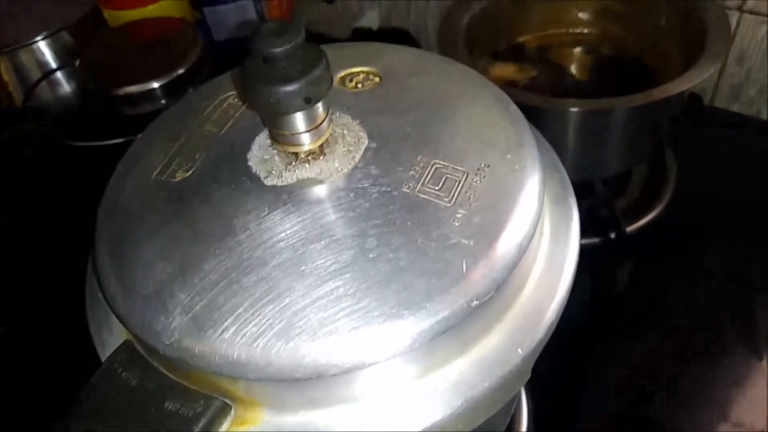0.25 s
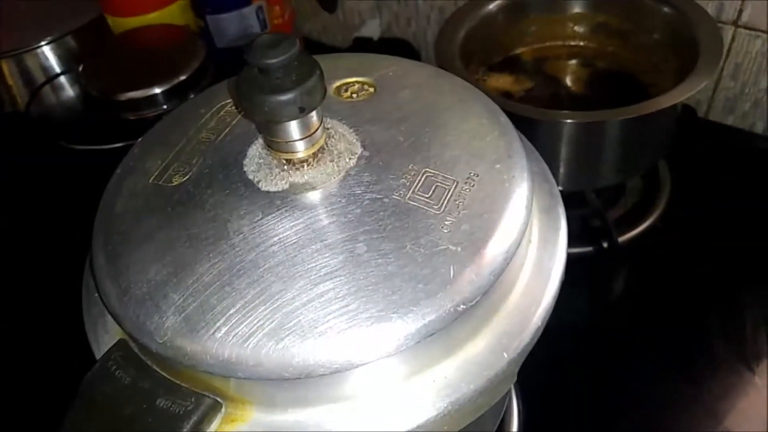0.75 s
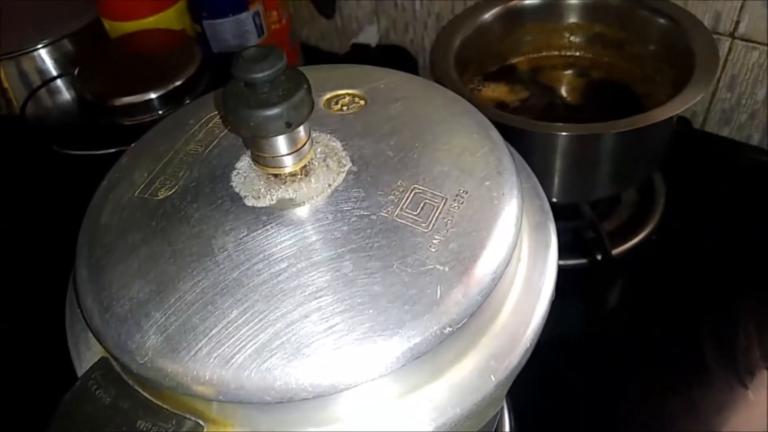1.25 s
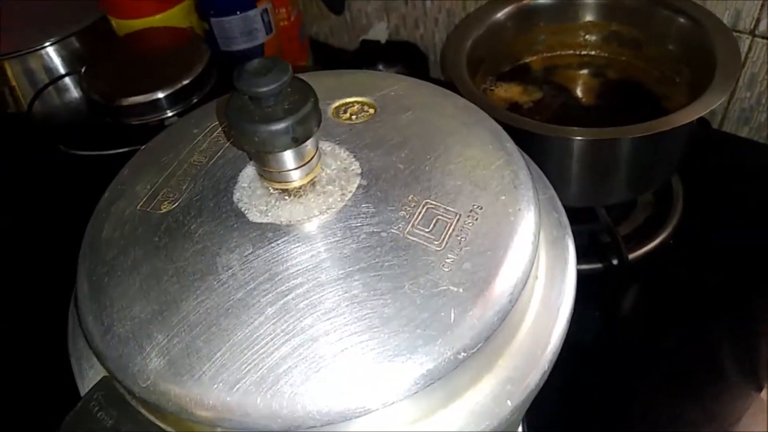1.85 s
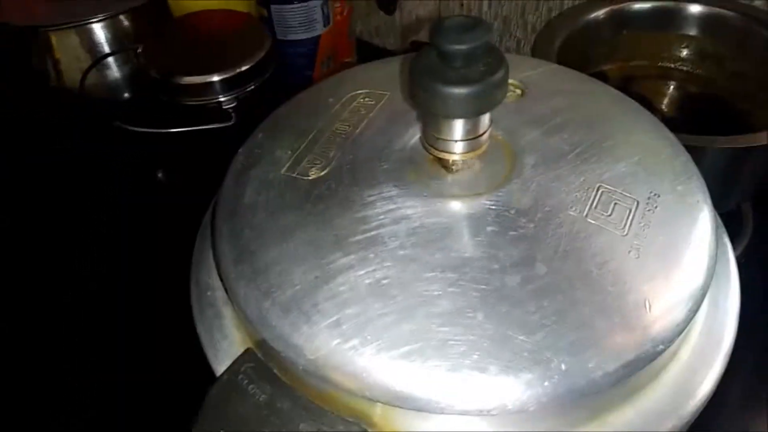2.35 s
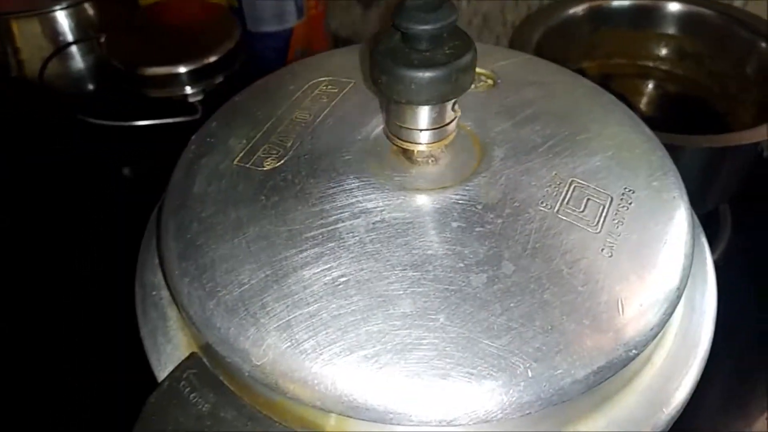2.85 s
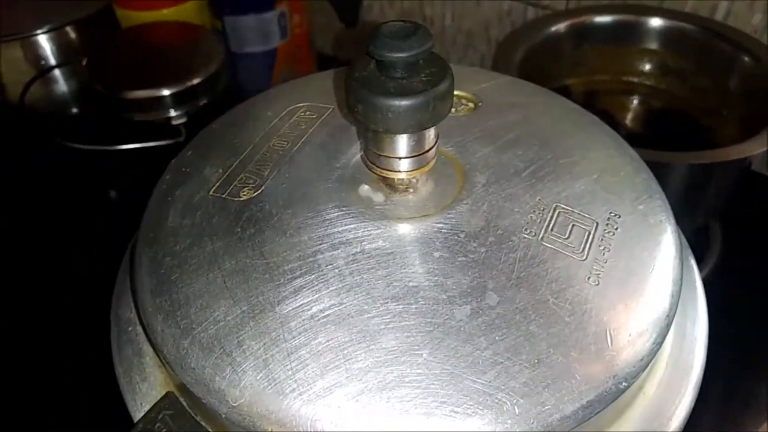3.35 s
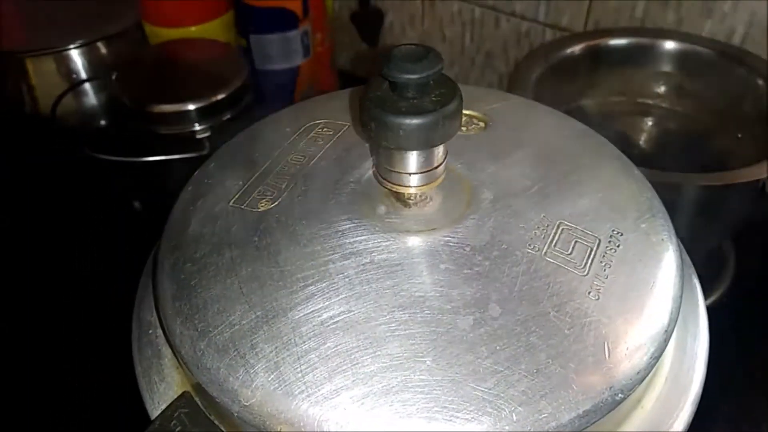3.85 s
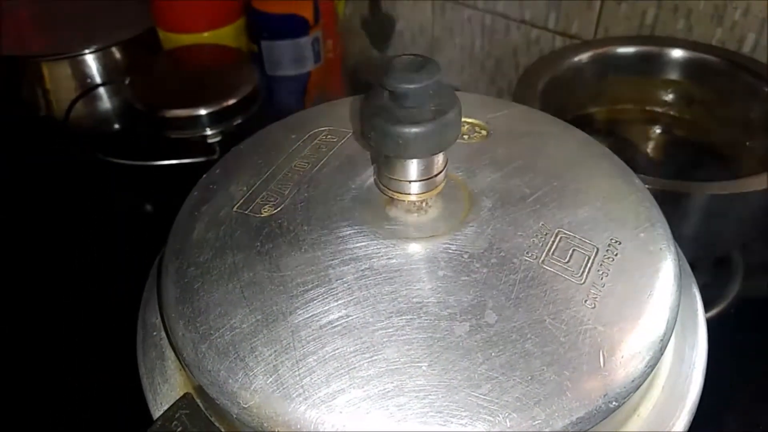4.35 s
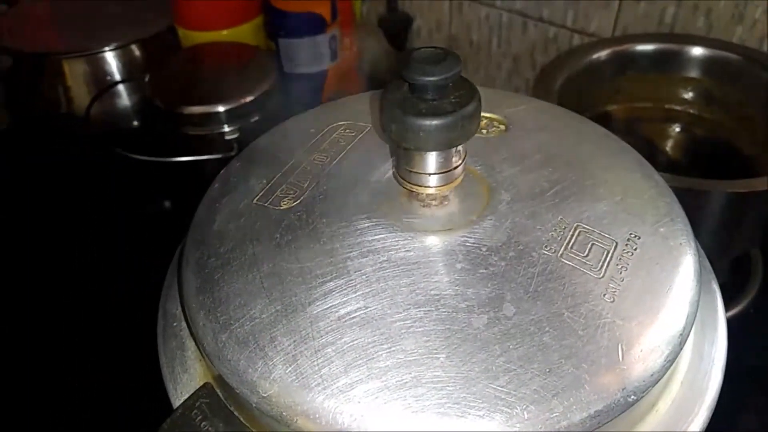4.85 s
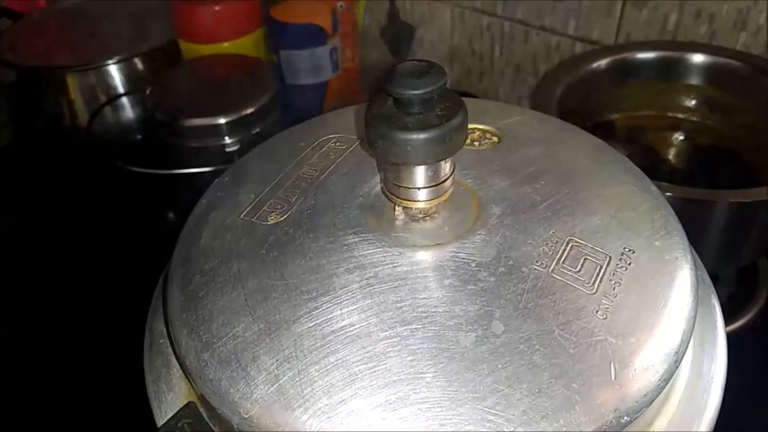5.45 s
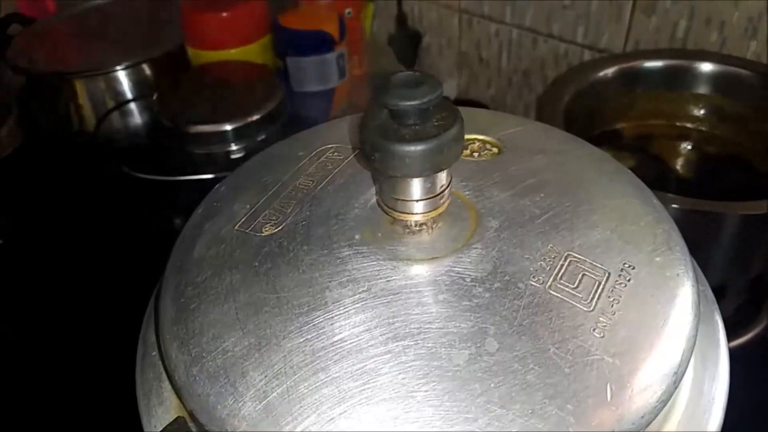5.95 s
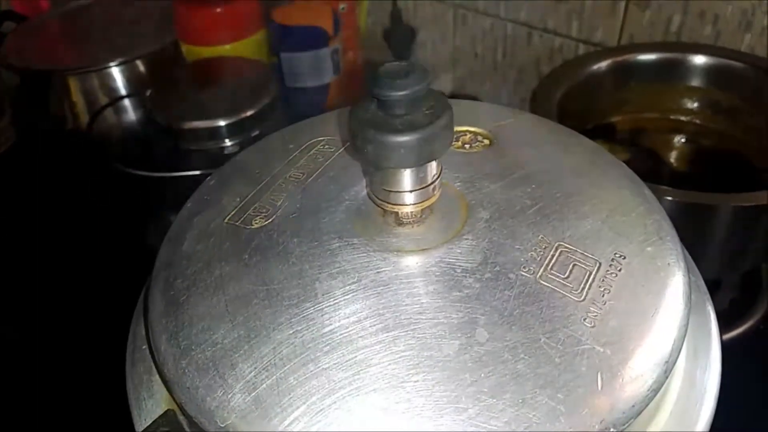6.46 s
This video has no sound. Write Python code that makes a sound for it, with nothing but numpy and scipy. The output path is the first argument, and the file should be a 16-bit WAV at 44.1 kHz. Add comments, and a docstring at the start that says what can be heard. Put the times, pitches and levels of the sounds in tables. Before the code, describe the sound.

A pressure cooker heard close up in stereo on a gas stove. From 0 to 2.3 s it is quiet: soft flame and room noise, a low hum dying away, high fine froth fizzing with tiny pops at the vent, and dull bubble thumps in the pot. A short dry steel scrape comes at 0.3 s; a longer one from 1.0 to 2.2 s, left-leaning, catches and sings with a thin wavering tone around 1.3 kHz, with a firmer knock near 1.57 s. At 2.3 s the vent blows clear with a burst and bright steam hiss continues, growing by 3.2 s. From 3.4 to 4.3 s the nozzle rings breathily and puffs sputter irregularly. It steadies until about 5.2 s, then chuffs return roughly every 0.15 s, strongest from 6 s to the end at 6.7 s, with livelier small bubbling beneath.

```python
"""A pressure cooker on a gas stove, close to two microphones. From the start: flame and room noise, a fading
hum, bubble thumps in the pot (damped modes) and froth fizzing at the vent (shaped noise with pops).
Steel is scraped from 0.3 s and again from 1 s, louder at the left: noise through modes, later a wavering tone.
At 2.3 s the vent blows clear and steam jets out as shaped noise, its regions swelling on their own.
From 3.3 s the nozzle rings and the rocking weight lets out puffs; the small bubbles grow louder at the end."""
import sys
import numpy as np
from scipy import signal
from scipy.io import wavfile
from scipy.ndimage import uniform_filter1d

SR = 44100
rng = np.random.default_rng(int(sys.argv[2]) if len(sys.argv) > 2 else 0)


def wav_out(sig):
    """Save sig, one row per channel (or a flat mono array), as 16-bit PCM at SR to the path in sys.argv[1]."""
    wavfile.write(sys.argv[1], SR, np.round(np.clip(np.atleast_2d(sig).T, -1, 1) * 32767).astype(np.int16))


N = 295847
FRAME_SAMPLES = 256  # short-time frame of froth and jet

# Froth at the vent: time_s, relative_level_db, relative_left_minus_right_db
FROTH_CURVE = [(0, -59.5, -9), (.7, -61.5, -7), (1.0, -58, -7), (1.11, -55, -8), (1.13, -64, -6),
               (1.45, -58.5, -11), (1.8, -59, -16), (2.12, -59.5, -9), (2.26, -56.5, -15)]
# Froth spectrum: frequency_hz, relative_density_db
FROTH_SPECTRUM = [(880, -61), (1500, -17), (2560, -8.5), (3260, -8), (3700, -10.5), (4480, -24),
                  (5100, -5.5), (5800, -1), (7490, 3), (8500, 6), (9700, 7.5), (10600, 0.5), (13000, -20)]
# Froth balance: frequency_hz, left_minus_right_db
FROTH_SIDES = [(60, -2.0), (150, -0.5), (380, 1.5), (950, 2), (2380, -1), (5980, -1.5), (15000, -16.5)]
# Larger bubbles popping in the foam: start_s, level_jump_db
FOAM_POPS = [(.07, 5.5), (.21, 2), (.295, 4), (.47, 2.5), (.58, 6), (0.72, 9), (.88, 2)]

# Thumps of big bubbles: start_s, peak_db, relative_weight_above_100_hz_db, tilt_190_to_760_hz_db_per_octave
BUBBLE_THUMPS = [(.304, -52.5, -5, -11), (.415, -60, -22, 2), (.756, -53.5, -36, 0), (1.121, -55.5, -5, -3),
                 (1.322, -52.5, 4, -11), (1.49, -53.5, -9, 7), (1.503, -61, -6, 13), (1.514, -61, -4, 6),
                 (1.561, -41.5, 8, -5.5), (1.572, -37, 22, -6), (1.595, -42.5, 22, -6.5),
                 (1.622, -51.5, 18, -7), (1.638, -49, 13, -9), (1.79, -50, -10, -9), (1.94, -52, -23, 8.5),
                 (2.105, -50.5, -8, -10), (2.138, -43.5, -21, -5), (2.199, -51, -36, -1),
                 (2.257, -44.5, -4, -2), (2.309, -51.5, 10, -11), (2.752, -52, -12, -10),
                 (2.856, -51, -21, -10), (2.929, -46.5, -12, -6), (3.054, -50.5, -12.5, -9),
                 (3.13, -48.5, -18, -3), (3.227, -49, -6, -5.5), (3.436, -49, 2, -3),
                 (3.554, -45.5, -12, -7), (3.654, -48.5, -14, 6), (3.893, -48, -11, 2),
                 (4.175, -43, -4, -7), (4.25, -57, 3, -10), (4.299, -45, -13, -4), (4.36, -54.5, -15, 10),
                 (4.405, -53.5, -30, 4), (4.475, -52.5, -1, -15), (4.759, -48, -13, -9),
                 (4.855, -41, -13.5, -8), (4.97, -45, -24, -1), (5.109, -48.5, -19, -12),
                 (5.207, -44.5, -27, -3), (5.314, -55, -18, 2), (5.665, -43.5, -8, -3),
                 (6.451, -48.5, 8, -3), (6.629, -55, 4, -10)]
# Pot modes before random spread: frequency_hz, relative_level_db, t60_s
POT_MODES = [(73, 0.5, 0.12), (164.2, 0.5, 0.17), (204, -3, 0.19), (260.5, -10, 0.12), (314.5, -2, 0.11),
             (398, 0, 0.062), (511, 1, 0.061), (656, 7, 0.036)]
# Small bubbles: time_s, level_change_db
SIMMER_CURVE = [(5.4, -15), (5.9, -11.5), (6.7, -4)]
# Flame and room spectrum: frequency_hz, relative_density_db
AIR_SPECTRUM = [(15, -35), (30, -19), (60, 0), (161, -3), (400, -7), (587, -13.5), (1550, -12), (2660, -29),
                (4450, -10.5), (6850, -23), (9460, -17), (11800, -13.5), (15800, -13.5)]
# Flame and room, part shared by the sides: frequency_hz, likeness_0_to_1
AIR_LIKENESS = [(50, 0.88), (300, 0.78), (700, 0.69), (1500, 0.013)]
# Low room hum: mean_frequency_hz, start_level_db, fade_s, waver_hz
HUM_TONES = [(321, -69.5, 0.73, 3.3), (165, -70, 1, 4)]

# Scraping: start_s, attack_s, hold_s, release_s, relative_level_db, ringing_share, relative_rasp_db,
# rasp_darkening_db_per_octave_per_s
SCRAPE_STROKES = [(0.285, 0.089, 0.037, 0.13, -57.5, .05, 14.5, 160),
                  (1.026, 0.075, 1, 0.16, -63, 0.89, -20, 5)]
# Strokes catching: start_s, level_rise_db, rasp_rise_db, fade_s
SCRAPE_CATCHES = [(1.168, 4.5, 0, 0.054), (1.372, 4, 12, 0.14), (1.551, 4.5, 11, 0.15), (1.82, 4, -7, 0.11)]
# Thin steel modes: frequency_hz, width_hz, relative_level_db
STEEL_MODES = [(1350, 260, -6), (3470, 28, -7), (3720, 28, -7), (4010, 1530, -6)]
# Dry rasp spectrum: frequency_hz, relative_density_db
RASP_SPECTRUM = [(1500, -22), (2000, 0), (2500, 4.5), (3000, 3), (3500, 2), (4100, 7), (4800, -14),
                 (6000, -19)]
# Main mode sinking: time_s, pitch_factor
MAIN_MODE_SAG = [(1.75, 1), (1.95, .976), (2.15, .97)]
# Broad low mode joining in: start_s, attack_s, hold_s, release_s
LOW_MODE_SPAN_S = (1.32, .1, .38, .2)
# Upper mode joining in: start_s, attack_s, hold_s, release_s
UPPER_MODE_SPAN_S = (1.57, .06, .31, .12)
# Near-pure tone of the low mode: time_s, pitch_hz, relative_level_db
SINGING_CURVE = [(1.32, 1265, -97), (1.36, 1262, -68), (1.42, 1262, -64), (1.46, 1270, -84),
                 (1.5, 1275, -59), (1.55, 1264, -86), (1.66, 1260, -78), (1.72, 1280, -59),
                 (1.79, 1250, -75.5), (1.9, 1252, -75), (2.04, 1270, -88)]
STROKE_EDGE_DB = -17  # level at both ends of an attack or release
SCRAPE_LEFT_RIGHT_DB, SCRAPE_LEFT_LAG_SAMPLES = (8.5, 5.2), 13.8

# Steam jet: time_s, relative_flow_db, hollow_swell_db, roar_swell_db, level_near_5300_hz_db
JET_CURVE = [(2.277, -50.5, 1, 1.5, -8), (2.57, -51, -1, 1, -2.5), (2.91, -48.5, -1.5, -0.5, -4),
             (3.05, -48, -1.5, 1, 1), (3.22, -41.5, -6.5, -2.5, -1), (3.4, -45.5, -4.5, 7, 4),
             (3.7, -41.5, -3.5, -1, 5), (4.02, -44.5, 0, -1, 3.5), (4.07, -46.5, -3.5, -1.5, 0.5),
             (4.4, -46, -2, -0.5, 0.5), (4.8, -45, 0, -2.5, 2), (5.1, -45, 3.5, -2, 0),
             (5.25, -45, 0.5, -3.5, 0.5), (5.8, -44.5, 0, -2, 1), (6.07, -46, 4, -0.5, -1),
             (6.51, -46.5, 0, -4.5, 0.5), (6.71, -41.5, -0.5, 0.5, 2.5)]
# Jet spectrum: frequency_hz, relative_density_db
JET_SPECTRUM = [(290, -26), (500, -30.5), (578, -25.5), (891, -24), (1400, -19.5), (2100, -16.5),
                (2900, -14), (3400, -8), (3620, -50), (3850, -8), (4500, -14), (5300, -10.5), (6000, -6.5),
                (8740, -0.5), (10900, -1.5), (12700, -13.5), (15100, -17.5), (15800, -14)]
# Jet balance: frequency_hz, left_minus_right_db
JET_SIDES = [(1000, 1), (2500, 2), (5500, -1.5), (7200, -3), (8300, -18), (9300, -3), (10500, -5.5),
             (12500, 3), (15000, -4.5)]
# Jet, part shared by the sides: frequency_hz, likeness_0_to_1
JET_LIKENESS = [(400, 0.98), (1500, 0.36), (4000, 0.35), (7000, 0.39), (10500, 0.36), (13000, 0.08),
                (15000, 0.29)]
# Nozzle, cap hollow, roar, fizz, band near 5.3 kHz: centre_hz, width_octaves, left_share, right_share
JET_REGIONS = [(8655, 0.17, 0.35, 1.204), (6805, 0.21, 1, 1.33), (1900, 1, 0.76, 0.9),
               (13850, 0.22, 0.64, 1.8), (5320, 0.2, 1, 1.47)]
# Thin hiss of a puff: centre_hz, width_octaves, left_share, right_share
PUFF_HISS = (10670, 0.2, 1.6, 1.26)
# Deep huff of a puff: centre_hz, width_octaves, left_share, right_share
PUFF_HUFF = (590, 1.6, 1.12, 1.7)
# Low chuff of a puff: width_octaves, left_share, right_share
PUFF_CHUFF = (0.64, 2.56, 2)
# Puffs under the rocking weight: time_s, length_s, chuff_centre_hz, flow_rise_db, nozzle_rise_db,
# hollow_rise_db, chuff_rise_db, hiss_rise_db, huff_rise_db
WEIGHT_PUFFS = [(3.396, 0.065, 2400, 3.5, -0.3, 7, 0, -1, -1),
                (3.682, 0.019, 2400, -1.5, 0, 3.5, 2.5, 2, 3), (3.726, 0.021, 1900, -1.5, 0, -2, 3, -3, 1),
                (3.833, 0.084, 2200, 0.8, 2.5, 4.5, 0.7, -1, -1),
                (3.887, 0.026, 2200, -0.5, 1.7, 2, -1, 1, 4), (3.938, 0.023, 2080, 0, 4, 5, 1.5, 0.5, 6.5),
                (4.097, 0.02, 1690, 1.5, 0.5, 3.5, 1.5, 0, 2.5),
                (4.183, 0.042, 2200, 1, 0.5, 5, 0.5, -0.5, 2.5),
                (4.28, 0.027, 2400, 3.5, 2.5, 4, 0, 0, 3.5), (4.333, 0.046, 2500, -1.5, 2.5, 2, 1.5, 1, 5),
                (5.173, 0.039, 1900, 2, 0, -2, -0.3, 0, 2.5),
                (5.32, 0.035, 1600, 3, 1.5, 2.5, 2.5, 0.5, -1.5),
                (5.428, 0.03, 1450, 2, 3.5, 5.5, 3.5, 1.5, 0),
                (5.57, 0.037, 1900, 4.5, -1, 7, 1, -0.5, -1.5), (5.698, 0.046, 1700, 2.5, -1, 6.5, 2, 0, 2),
                (5.872, 0.039, 1610, 5, 0.5, 4, 1.5, 1.5, 1.5), (5.996, 0.048, 1610, 8, 2, 4, 3, -1.5, 1.5),
                (6.156, 0.051, 2170, 5.5, 10, 9, 4, 4, 1.5), (6.318, 0.051, 1670, 6.5, 10, 8.5, 5, 4, 1),
                (6.452, 0.047, 1760, 6.5, 1, 0.5, 4, 1, -1), (6.552, 0.009, 2600, 3.5, 8, 4, 0.5, 0.5, 1),
                (6.602, 0.046, 2320, 10, 6, 8, 3.5, -1, -2), (6.66, 0.057, 2020, -5.5, 7.5, 3.5, 1.5, 3, 4)]
# Lead of flow, nozzle, hollow, chuff, hiss, huff on the puff time, one per part: lead_s
PUFF_LEADS_S = (0.0034, -0.011, -0.0069, -0.0012, 0.004, 0.0041)
# Nozzle ringing: start_s, fall_start_s, ring_db
NOZZLE_RINGING = [(3.349, 3.722, 8.5), (3.865, 4.038, 5.5), (4.273, 4.318, 6), (4.773, 4.813, 2.5)]
# Top of the hiss: time_s, swell_db
FIZZ_CURVE = [(2.3, 0.5), (2.5, 1.5), (2.8, 0), (3.1, 2), (4.0, 0), (5.0, 1), (6.0, 3), (6.7, 4)]
# Microphone pair turning a little: time_s, left_minus_right_db, left_lag_samples
MICROPHONE_TURN = [(2.28, -9, 13), (2.4, 0, 11.4), (4.2, 3, 12.7), (4.6, 1.5, 12.2), (5.1, 7, 8.4),
                   (5.3, 5.5, 8.4), (6.7, 3, 8.3)]


def gain_of(db):
    """Decibels to amplitude."""
    return 10 ** (np.asarray(db) / 20)


def evened(x):
    """Scales to unit rms."""
    return x / np.sqrt(np.mean(x ** 2) + 1e-20)


def read(points, hz):
    """Reads a spectrum on a log-frequency axis."""
    f, value = np.transpose(points)
    return np.interp(np.log(hz + 1), np.log(f + 1), value)


def columns(rows, t):
    """Reads every column of a curve table at times t."""
    s, *rest = np.transpose(rows)
    return [np.interp(t, s, c) for c in rest]


def kick(t, start_s, rise_s, fade_s):
    """Rises from 0 to 1 at start_s, then decays exponentially."""
    return np.clip((t - start_s) / rise_s, 0, 1) * np.exp(-np.maximum(t - start_s - rise_s, 0) / fade_s)


def stroke(t, start_s, attack_s, hold_s, release_s):
    """Linear attack, hold and release, from 0 to 1 and back."""
    return np.interp(t, np.cumsum([start_s, attack_s, hold_s, release_s]), [0, 1, 1, 0])


def near(hz, centre_hz, octaves, power):
    """Bell over log frequency, flatter on top for a higher power."""
    return np.exp(-(np.log2((hz + 1) / centre_hz) / octaves) ** power)


def drift(shape, *spans):
    """Smooth random field of unit rms, averaged over the given span along each axis."""
    x = rng.standard_normal(shape)
    for axis, span in enumerate(spans):
        x = uniform_filter1d(uniform_filter1d(x, span, axis), span, axis)
    return evened(x)


def grid(size):
    """Frame times and bin frequencies of short-time spectra."""
    return np.arange(4 * N // size + 5) * size / 4 / SR, np.fft.rfftfreq(size, 1 / SR)


def noise_pair(db, likeness, left_lag_samples, size):
    """Two noises from dB fields (channel, frame, bin), with a shared part that arrives late at the left."""
    a, b, c, d = np.moveaxis(rng.standard_normal(db.shape[1:] + (4,)), 2, 0)
    likeness = np.clip(likeness, 0, 1)
    right = a + 1j * b
    late = np.exp(-2j * np.pi * np.arange(size // 2 + 1) * left_lag_samples / size)
    left = likeness * late * right + np.sqrt(1 - likeness ** 2) * (c + 1j * d)
    spectra = np.array([left, right]) * gain_of(db)
    return signal.istft(np.swapaxes(spectra, 1, 2), nperseg=size, noverlap=3 * size // 4)[1][:, :N]


def level_colour(colour, hz, lo_hz, hi_hz):
    """The colour, scaled so that its power between the two edges is 0 dB."""
    db = read(colour, hz)
    return db - 10 * np.log10(np.sum(gain_of(db[(hz > lo_hz) & (hz < hi_hz)]) ** 2))


def sides(balance_db):
    """Splits a left-minus-right level into two gains in dB of constant total power."""
    right = 10 * np.log10(2 / (1 + gain_of(balance_db) ** 2))
    return np.array([right + balance_db, right])


def spit(depth_db, span_samples):
    """Fast random level flutter of unit rms, as from droplets in a stream or uneven friction."""
    flutter = gain_of(depth_db * drift(N, span_samples))
    return flutter / np.sqrt(np.mean(flutter ** 2))


def froth():
    """Fine bubbles burst in the foam ring until the vent blows clear: fluttering noise with pops."""
    t, hz = grid(FRAME_SAMPLES)
    level_db, pan_db = columns(FROTH_CURVE, t)
    level_db = level_db + sum(db * kick(t, s, rise_s=0.0023, fade_s=0.053) for s, db in FOAM_POPS)
    db = level_colour(FROTH_SPECTRUM, hz, 5500, 11500) + level_db[:, None] + 8.0
    pan_db = 0.28 * (pan_db - np.median(pan_db))
    db = db + sides(read(FROTH_SIDES, hz) + pan_db[:, None])
    db = db + 0.79 * drift(db.shape[1:], 40, 5) + 0.94 * drift(len(t), 8)[:, None]
    before_jet = np.arange(N) < JET_CURVE[0][0] * SR
    return noise_pair(db, 0.14, 19.3, FRAME_SAMPLES) * spit(0.42, 20) * before_jet


def small_bubbles():
    """Random small thumps as rows like the thump table, quieter until late."""
    rows = []
    for at, size, dull in rng.random((round(36 * N / SR), 3)):  # 36 per second
        s = at * N / SR
        peak_db = -58 + columns(SIMMER_CURVE, s)[0] + 9 * size ** 2
        rows.append((s, peak_db, 3.1 - 16 * dull, -3 + 1.5 * dull))
    return rows


def pot():
    """Each collapsing bubble softly pushes the pot wall, whose modes ring down; small ones fill the gaps."""
    push_s = 0.015
    t = np.arange(6500) / SR
    out = np.zeros((2, N + 6500))
    hz, mode_db, t60_s = np.transpose(POT_MODES)[:, :, None]
    for s, peak_db, upper_db, tilt_db in list(BUBBLE_THUMPS) + small_bubbles():
        detune, turn, weight, apart = rng.uniform(-0.95, 1, (4, len(POT_MODES), 1))
        level_db = mode_db + 5.4 * weight + (upper_db + 4.5) * (hz > 100)
        level_db = level_db + tilt_db * np.clip(np.log2(hz / 190), 0, 2)
        envelope = gain_of(level_db - 60 * t / t60_s) * (1 - np.exp(-(t / push_s) ** 2))
        angle = 2 * np.pi * hz * (1 + 0.052 * detune) * t + np.pi * turn
        # nearly alike at both microphones
        ring = np.array([(envelope * np.sin(angle + side * 0.45 * apart)).sum(0) for side in (1, -1)])
        out[:, round(s * SR):][:, :len(t)] += gain_of(peak_db) * ring / abs(ring).max()
    return out[:, :N]


def air():
    """Flame and room noise, much alike at both microphones in the bass."""
    t, hz = grid(2048)
    db = level_colour(AIR_SPECTRUM, hz, 25, 3700) - 67.5 + 4.1 * drift((len(t), len(hz)), 5, 6)
    return noise_pair(np.array([db, db]), read(AIR_LIKENESS, hz), 0, 2048)


def hum(hz, level_db, fade_s, waver_hz):
    """A soft fading tone with drifting pitch, the same at both microphones."""
    waver, swell_db = drift((2, N), 1, 2500)
    turns = np.cumsum(hz + waver_hz * waver) / SR
    fade = np.exp(-(np.arange(N) / SR / fade_s) ** 2)
    return gain_of(level_db + swell_db) * fade * np.sin(2 * np.pi * turns)


def scrape():
    """Uneven friction noise rings a few modes of thin steel over a dry rasp."""
    t, hz = grid(1024)
    pitch, = columns(MAIN_MODE_SAG, t)
    power = np.full((len(t), len(hz)), 1e-14)
    catch_db, rough_db = sum(np.outer(rise_db, kick(t, s, 0.013, fade_s))
                             for s, *rise_db, fade_s in SCRAPE_CATCHES)
    low_db = -4 + 3.1 * STROKE_EDGE_DB * (1 - stroke(t, *LOW_MODE_SPAN_S))
    upper_db = STROKE_EDGE_DB * (1 - stroke(t, *UPPER_MODE_SPAN_S))
    for *shape_s, level_db, ringing, rasp_db, darken_db in SCRAPE_STROKES:
        press = stroke(t, *shape_s)
        held_s = np.clip(t - shape_s[0] - shape_s[1] - 0.015, -0.05, 0.05)
        tilt_db = darken_db * np.outer(held_s, np.log2(np.clip(hz, 2000, 5000) / 3100))
        rasp_level_db = (rasp_db + rough_db)[:, None] - 21.0 - tilt_db
        tone = gain_of(level_colour(RASP_SPECTRUM, hz, 2000, 4200) + rasp_level_db) ** 2
        for k, (mode_hz, width_hz, mode_db) in enumerate(STEEL_MODES):
            centre_hz = mode_hz * pitch[:, None] ** (k == 1)  # only the main mode sinks
            mode = 1 / (1 + (2 * (hz - centre_hz) / width_hz) ** 2) ** 2
            moving_db = low_db * (k == 0) + upper_db * (k == 2) + 0.5 * rough_db * (k == 3)
            weight = ringing * gain_of(mode_db + moving_db) ** 2
            tone += (weight / mode.sum(1))[:, None] * mode
        stroke_db = level_db + catch_db + STROKE_EDGE_DB * (1 - press)
        power += (gain_of(stroke_db) ** 2 * (press > 0))[:, None] * tone
    db = 10 * np.log10(power) + np.reshape(SCRAPE_LEFT_RIGHT_DB, (2, 1, 1))
    return noise_pair(db, 0.35, SCRAPE_LEFT_LAG_SAMPLES, 1024) * spit(1.9, 150)


def singing():
    """The low steel mode sings almost purely: a tone that wavers a little in pitch and level."""
    hz, db = columns(SINGING_CURVE, np.arange(N) / SR)
    waver, swell = drift((2, N), 1, 700)
    angle = 2 * np.pi * np.cumsum(hz + 9.8 * waver) / SR
    late = 2 * np.pi * hz * SCRAPE_LEFT_LAG_SAMPLES / SR
    level_db = db + 2.0 * swell + np.reshape(SCRAPE_LEFT_RIGHT_DB, (2, 1))
    sounding = np.arange(N) < SINGING_CURVE[-1][0] * SR
    return sounding * gain_of(level_db) * np.sin([angle - late, angle])


def jet():
    """Turbulent steam; nozzle, cap hollow, roar and fizz swell as the weight tilts and lifts."""
    ring_rise_s, ring_fall_s = 0.0094, 0.029
    blast_db, blast_s = (0.51, 0.68, 9.4, 6.8, 12.5), 0.071  # flow, nozzle, hollow, roar, fizz
    t, hz = grid(FRAME_SAMPLES)
    start_s = JET_CURVE[0][0]
    flow_db, hollow_db, roar_db, near_5300_hz_db = columns(JET_CURVE, t)
    pan_db, left_lag_samples = columns(MICROPHONE_TURN, t)
    nozzle_db = sum(db * stroke(t, s, ring_rise_s, max(end_s - s - ring_rise_s, 0), ring_fall_s)
                    for s, end_s, db in NOZZLE_RINGING)
    pan_db = pan_db - 0.41 * nozzle_db  # ringing leans to the right
    fizz_db, = columns(FIZZ_CURVE, t)
    hiss_db, huff_db = np.zeros((2, len(t)))
    chuff_db = np.zeros((len(t), len(hz)))

    # the vent blows clear
    blast = np.outer(blast_db, np.exp(-(np.maximum(t - start_s, 0) / blast_s) ** 2))
    parts = np.array([flow_db, nozzle_db, hollow_db, roar_db, fizz_db]) + blast
    flow_db, nozzle_db, hollow_db, roar_db, fizz_db = parts

    for s, length_s, chuff_hz, *rise_db in WEIGHT_PUFFS:
        lift = np.exp(-((np.add.outer(PUFF_LEADS_S, t) - s) / length_s) ** 2)
        parts = np.array([flow_db, nozzle_db, hollow_db, 0 * t, hiss_db, huff_db])
        parts = parts + np.reshape(rise_db, (-1, 1)) * lift
        flow_db, nozzle_db, hollow_db, chuff, hiss_db, huff_db = parts
        chuff_db = chuff_db + np.outer(chuff, near(hz, chuff_hz, PUFF_CHUFF[0], 4))
    near_5300_hz_db = near_5300_hz_db + 0.56 * hollow_db

    db = level_colour(JET_SPECTRUM, hz, 9815, 11710) + flow_db[:, None] + 4.5
    aimed = near(hz, 7500, 0.39, 2)  # only the bright part of the jet is directional
    db = db + sides(read(JET_SIDES, hz) + np.outer(pan_db, aimed))
    swells_db = [nozzle_db, hollow_db, roar_db, fizz_db, near_5300_hz_db, hiss_db, huff_db]
    regions = list(JET_REGIONS) + [PUFF_HISS, PUFF_HUFF]
    for swell_db, (centre_hz, octaves, *shares) in zip(swells_db, regions):
        db = db + np.multiply.outer(shares, np.outer(swell_db, near(hz, centre_hz, octaves, 6)))
    db = db + np.multiply.outer(PUFF_CHUFF[1:], chuff_db)
    eddies = np.array([drift(db.shape[1:], 50, 4) for _ in range(2)])  # colour each side apart
    db = db + 1.1 * eddies + 1.05 * drift(len(t), 10)[:, None]
    opened = np.clip((np.arange(N) / SR - start_s) / 0.0021, 0, 1)
    steam = noise_pair(db, read(JET_LIKENESS, hz), left_lag_samples[:, None], FRAME_SAMPLES)
    return steam * spit(0.91, 14) * opened


def spectral_ripple(x):
    """Sparse faint delayed copies, different at each side, lightly ripple the spectrum."""
    taps = np.zeros((2, 700))
    delay_samples = (np.geomspace(30, 600, 14) * rng.uniform(.85, 1.15, (2, 14))).astype(int)
    copies = gain_of(-17) * rng.choice([-1., 1.], delay_samples.shape)
    np.put_along_axis(taps, delay_samples, copies, 1)
    taps[:, 0] = 1  # direct sound
    return signal.oaconvolve(x, taps / np.linalg.norm(taps[0]), axes=1)[:, :N]


def scene():
    """All sources at the two microphones."""
    rippled = spectral_ripple(froth() + scrape() + singing() + jet())
    return rippled + pot() + air() + sum(hum(*row) for row in HUM_TONES)


def record(dry):
    """The band limit of the recorder: a linear-phase low-pass."""
    lowpass = signal.firwin(511, 15760, window=("kaiser", 9), fs=SR)  # cutoff in Hz
    return signal.oaconvolve(dry, lowpass[None], "same")


dry = scene()
out = record(dry)
wav_out(out)
```